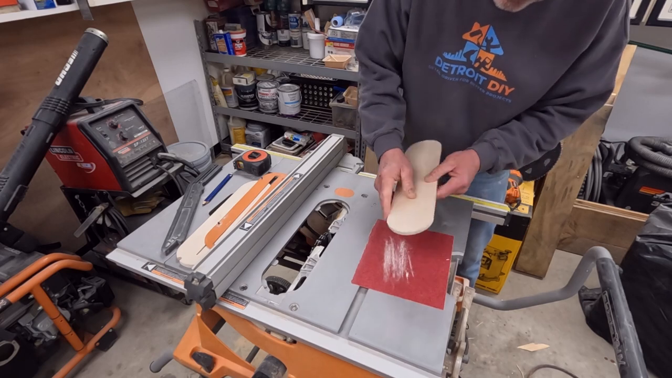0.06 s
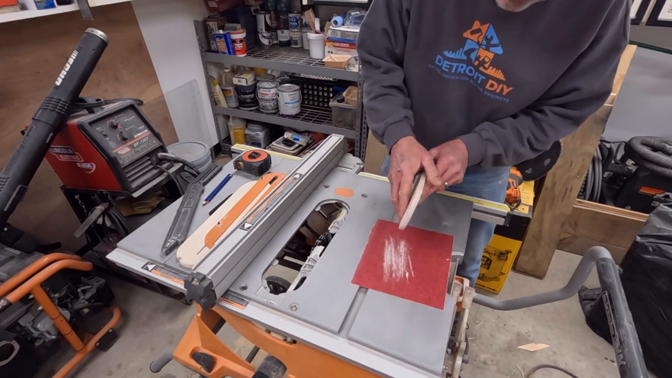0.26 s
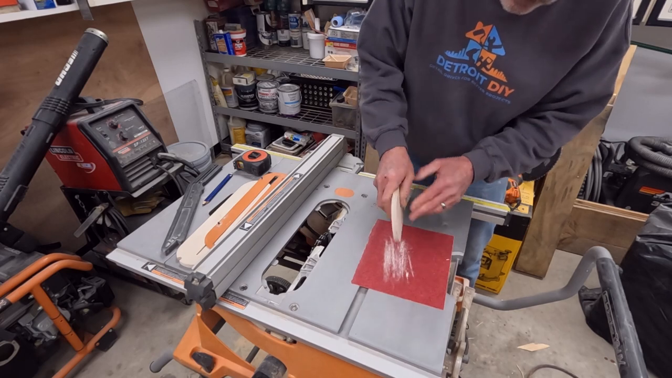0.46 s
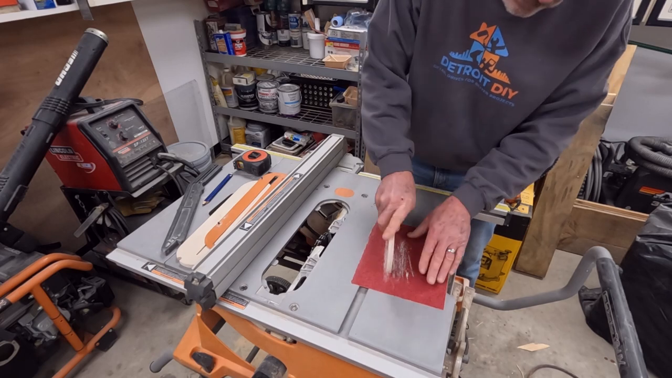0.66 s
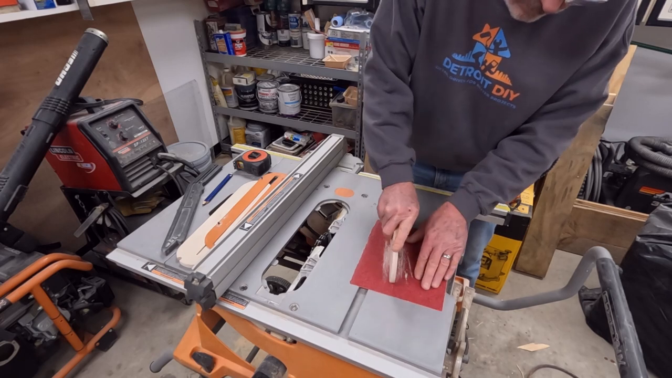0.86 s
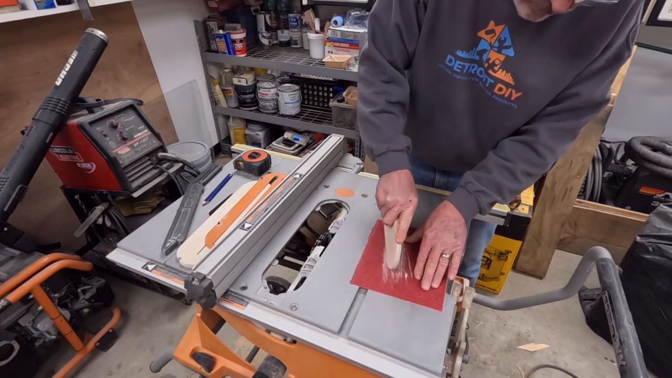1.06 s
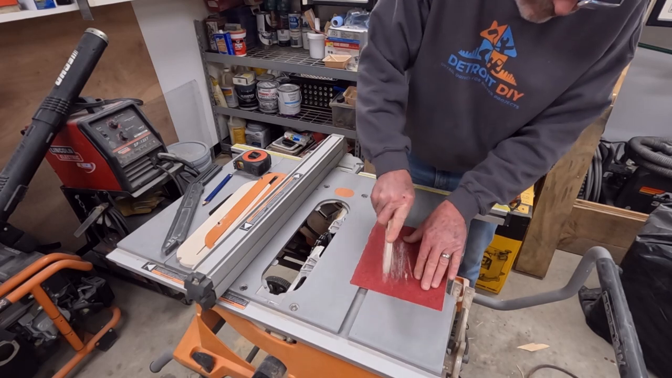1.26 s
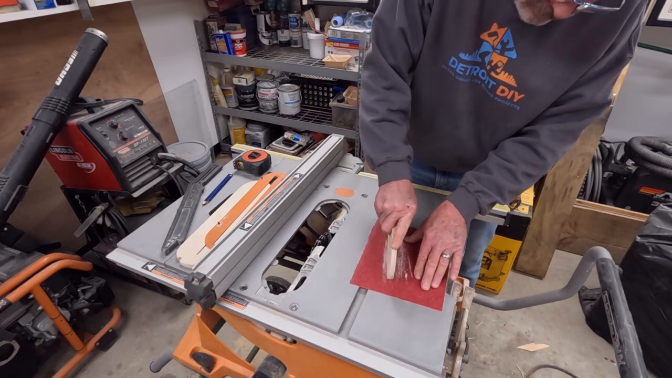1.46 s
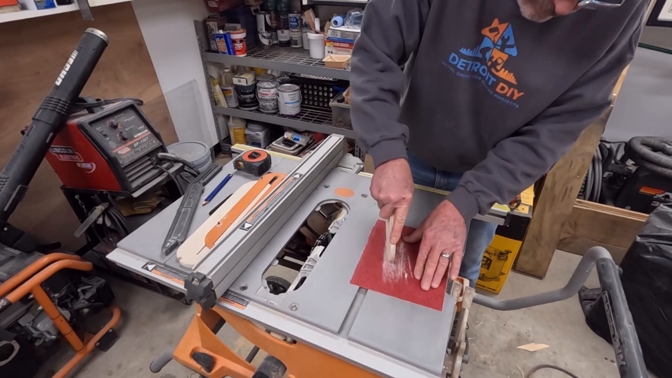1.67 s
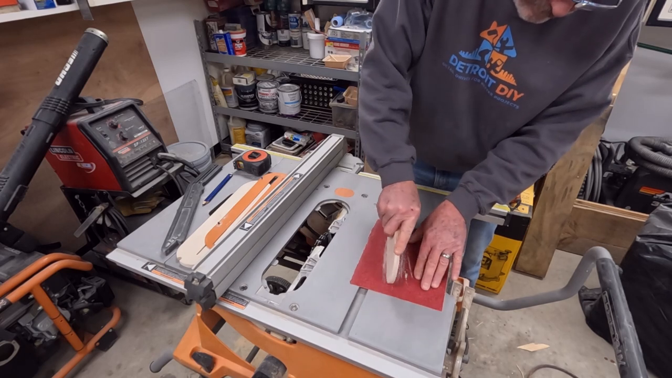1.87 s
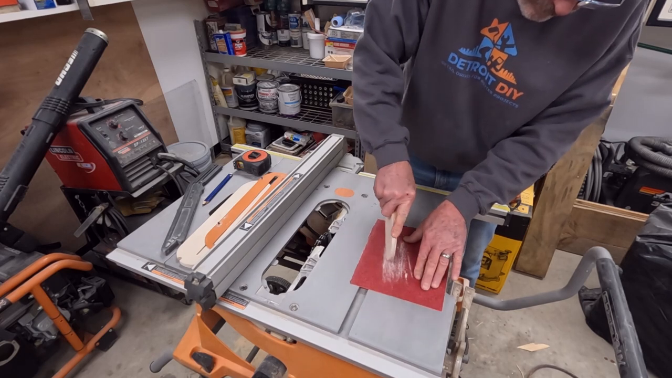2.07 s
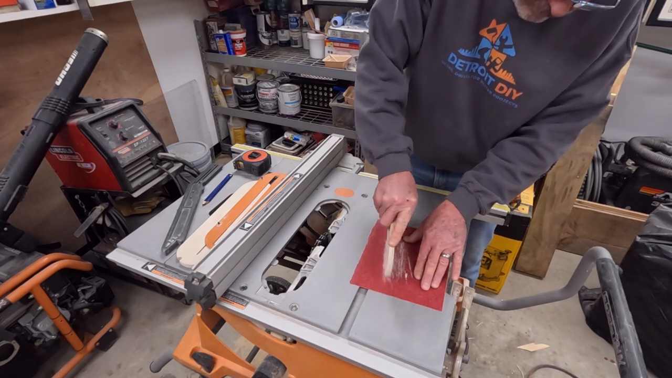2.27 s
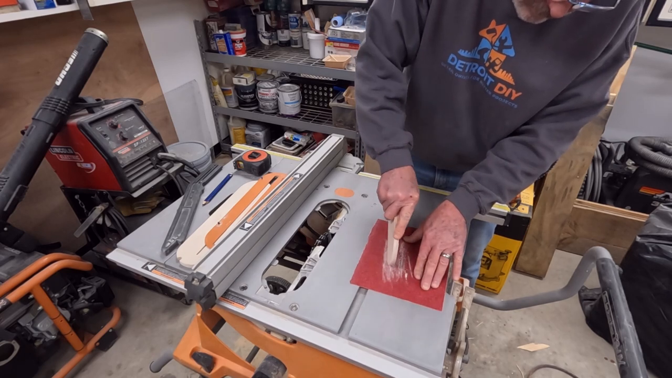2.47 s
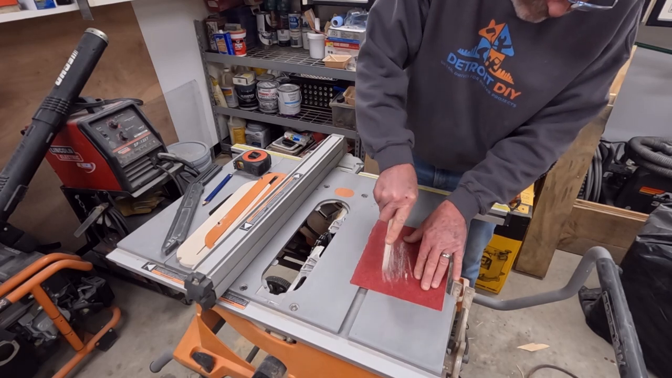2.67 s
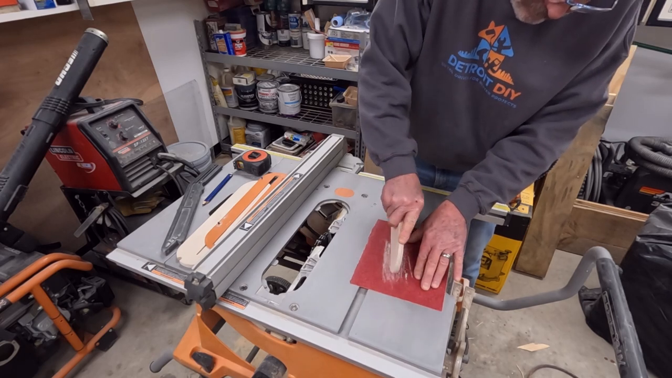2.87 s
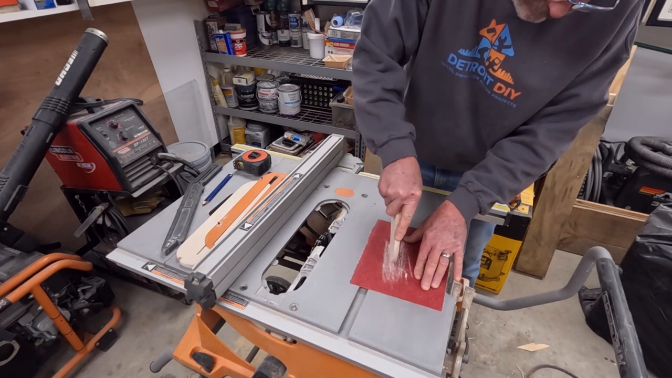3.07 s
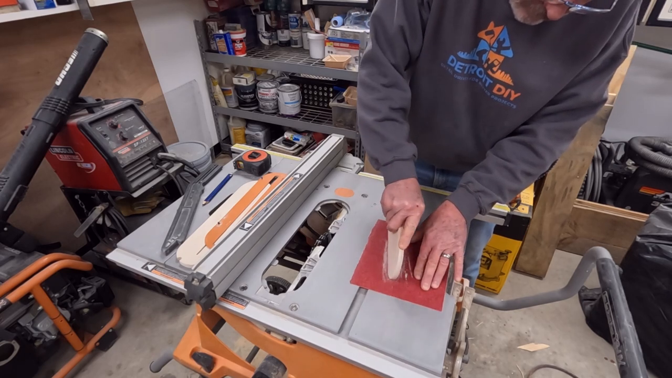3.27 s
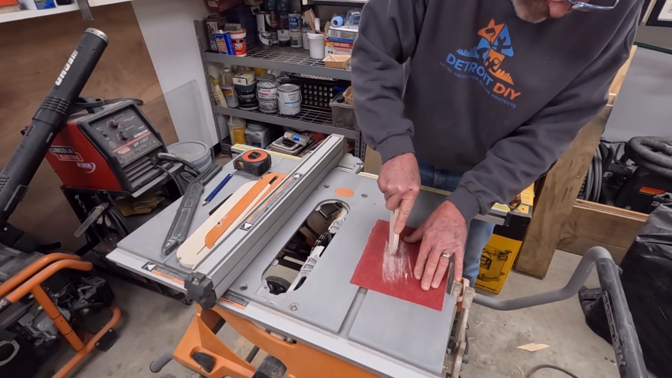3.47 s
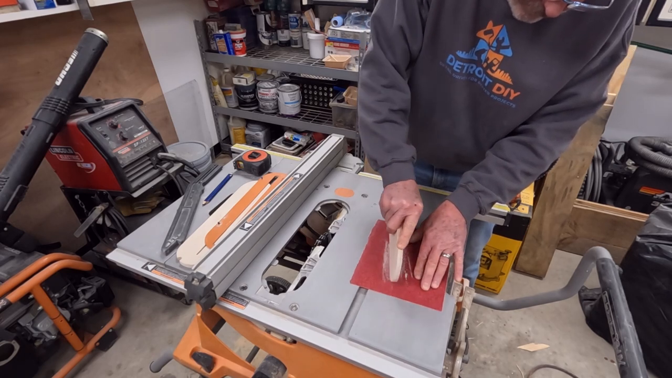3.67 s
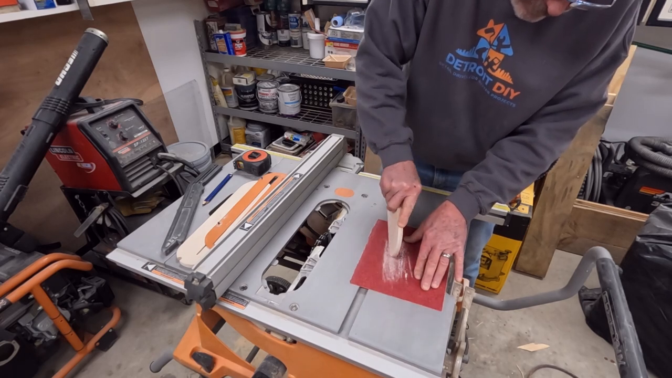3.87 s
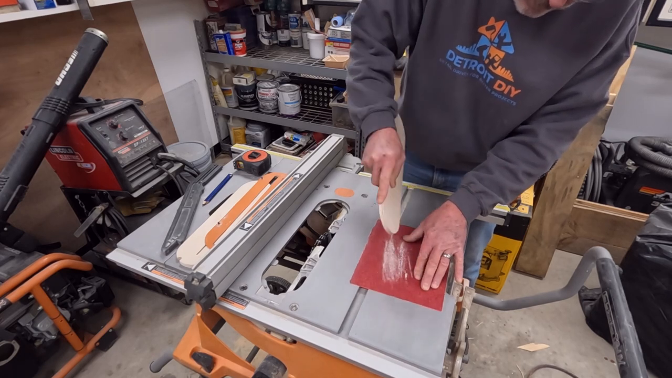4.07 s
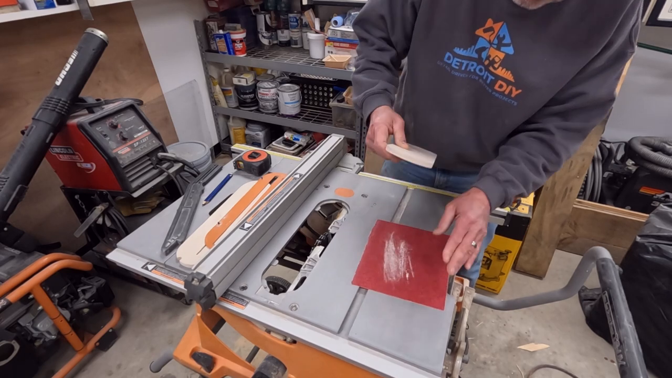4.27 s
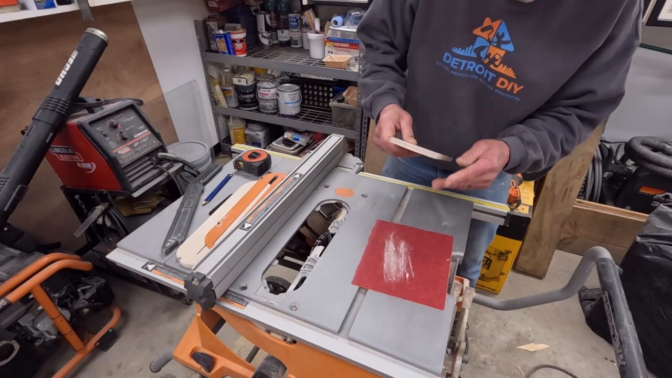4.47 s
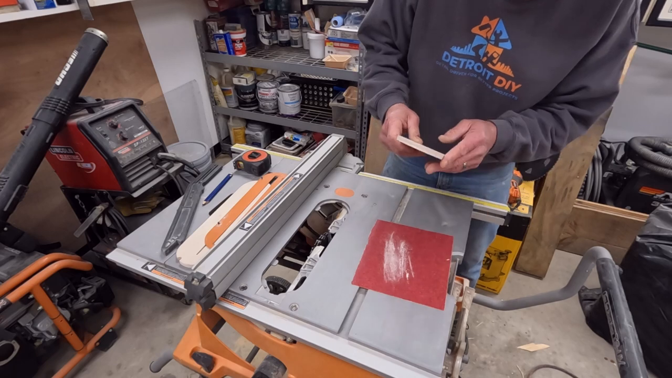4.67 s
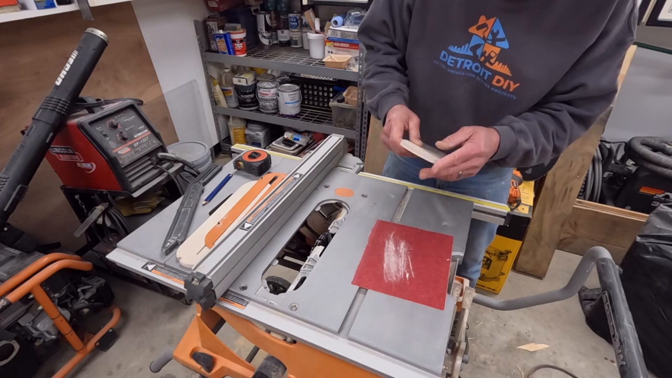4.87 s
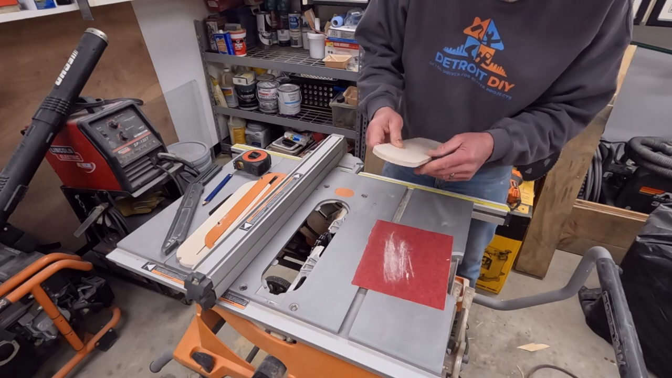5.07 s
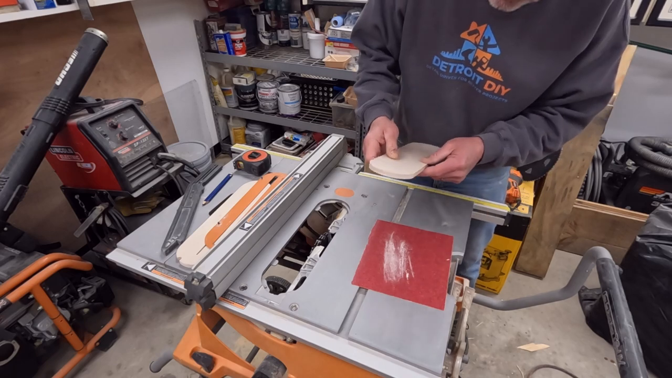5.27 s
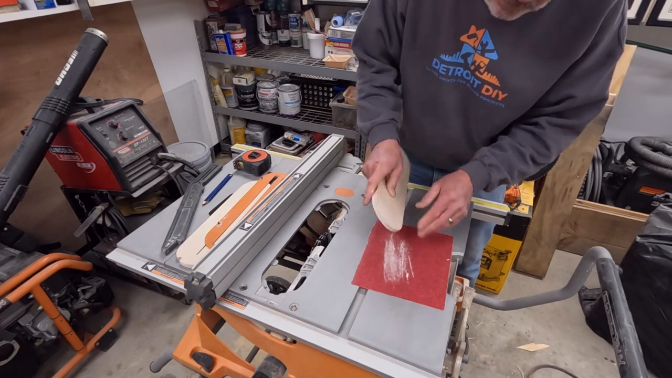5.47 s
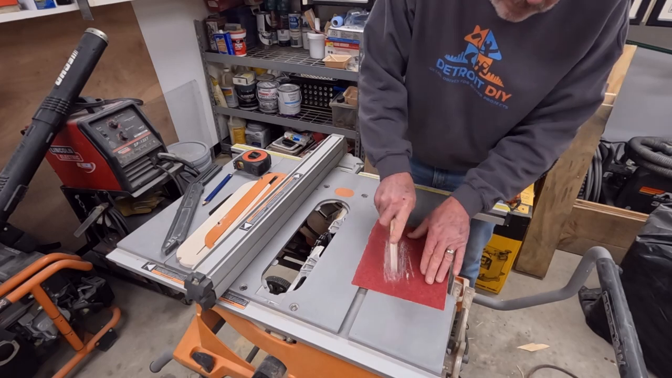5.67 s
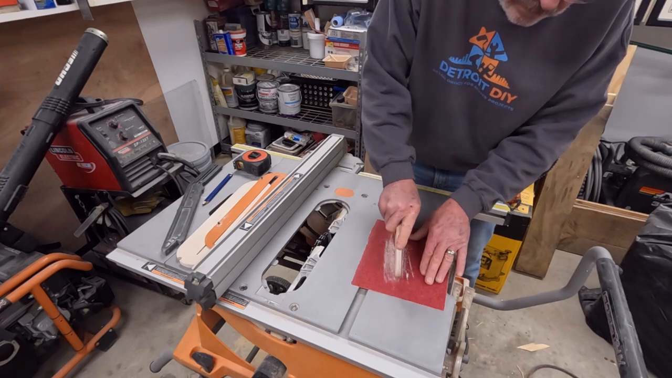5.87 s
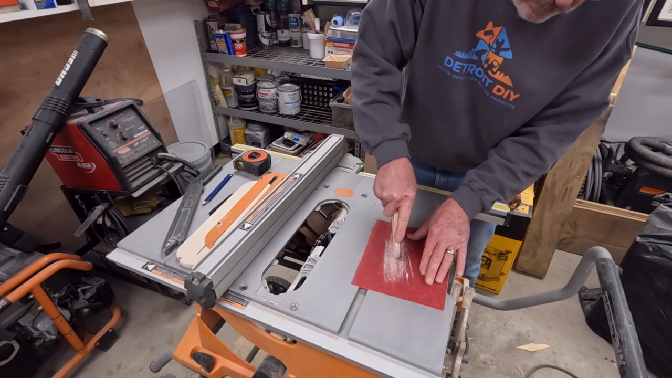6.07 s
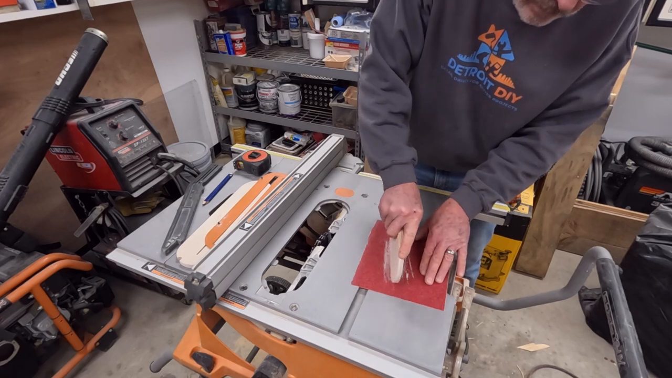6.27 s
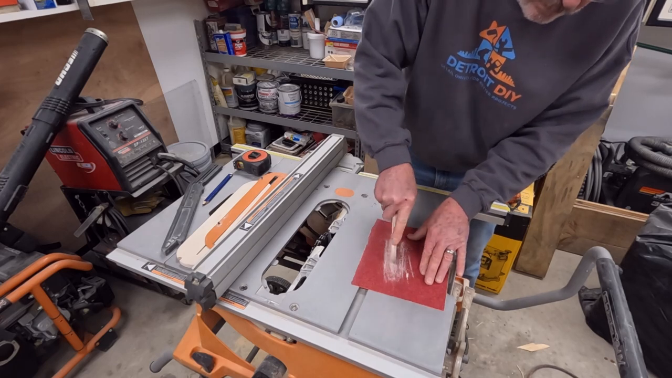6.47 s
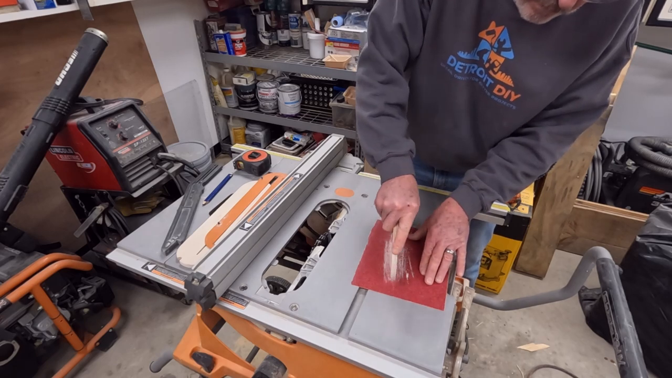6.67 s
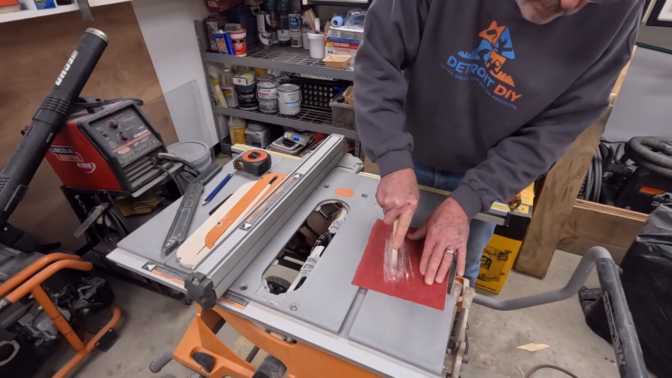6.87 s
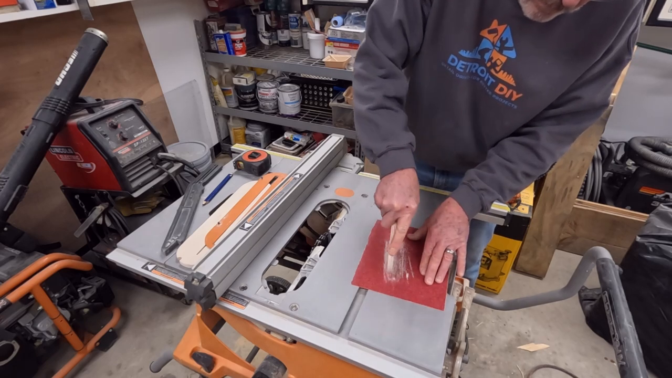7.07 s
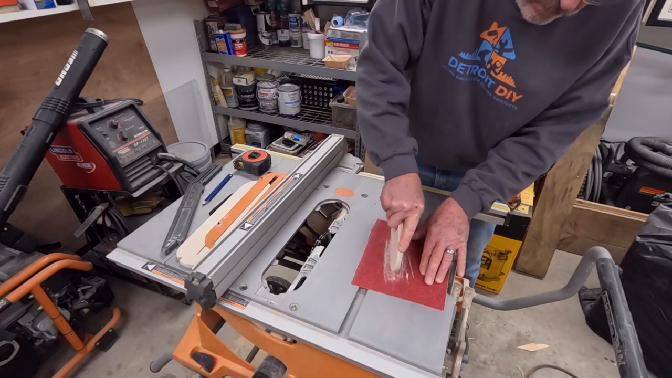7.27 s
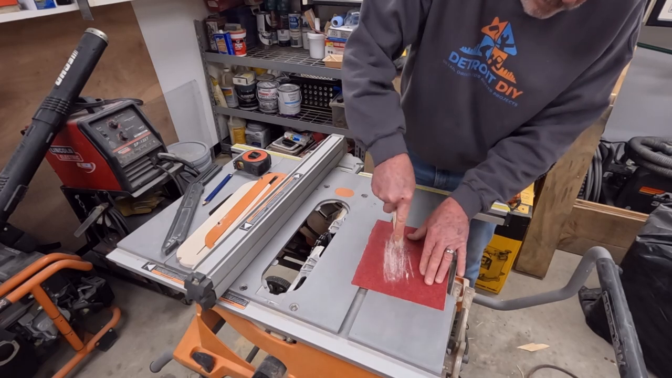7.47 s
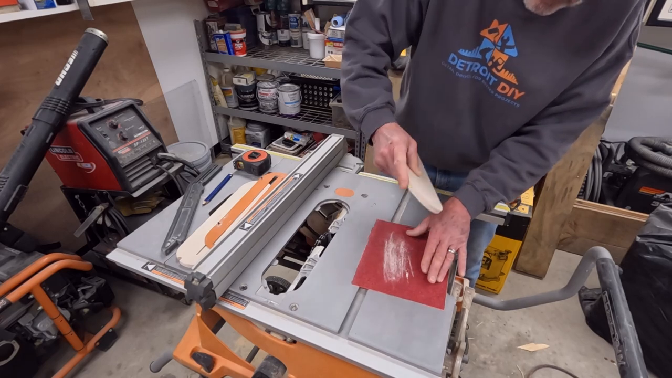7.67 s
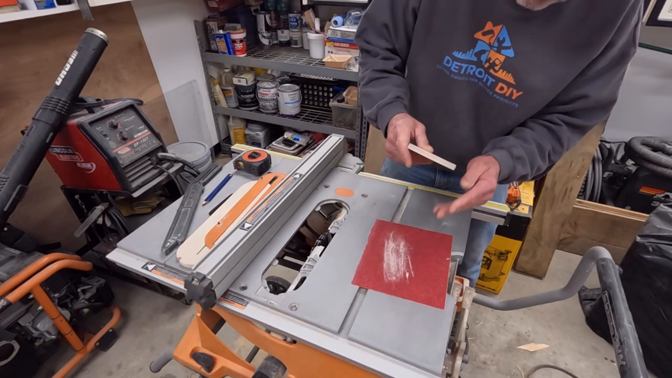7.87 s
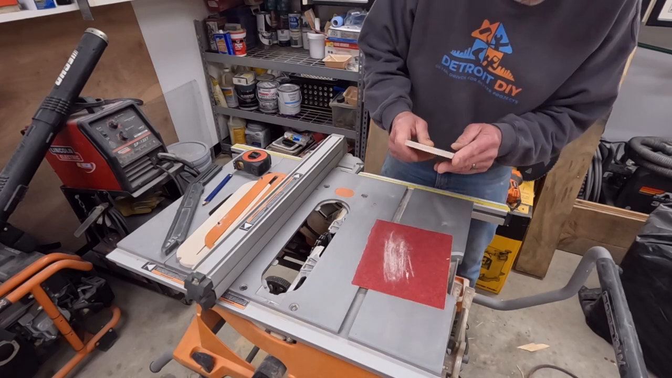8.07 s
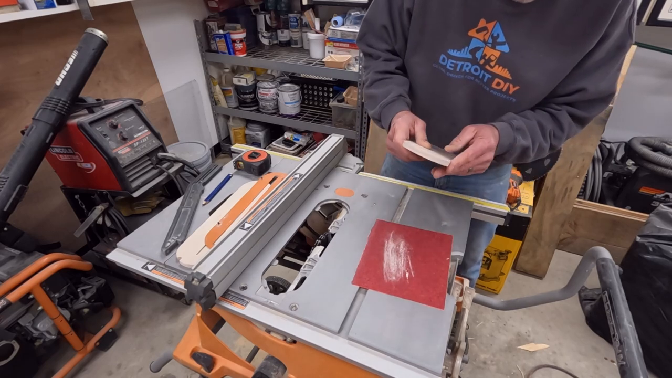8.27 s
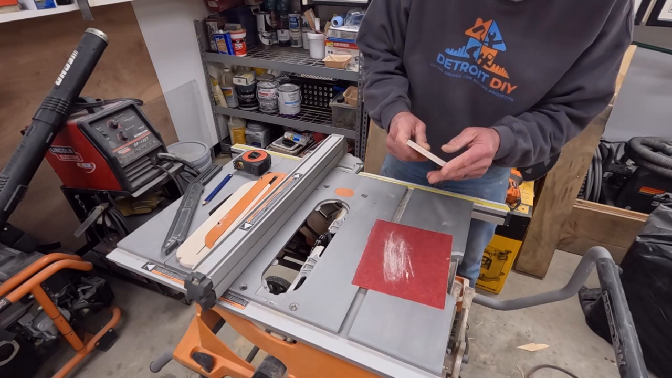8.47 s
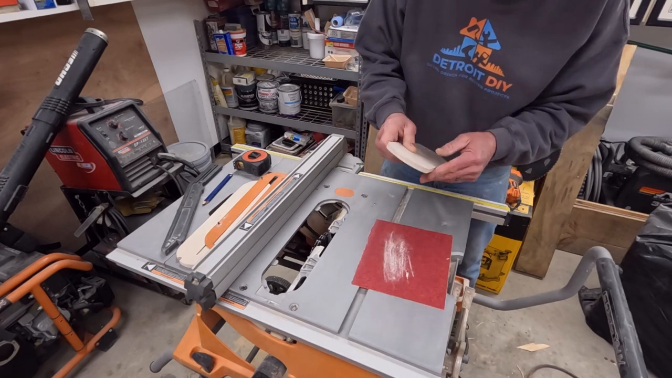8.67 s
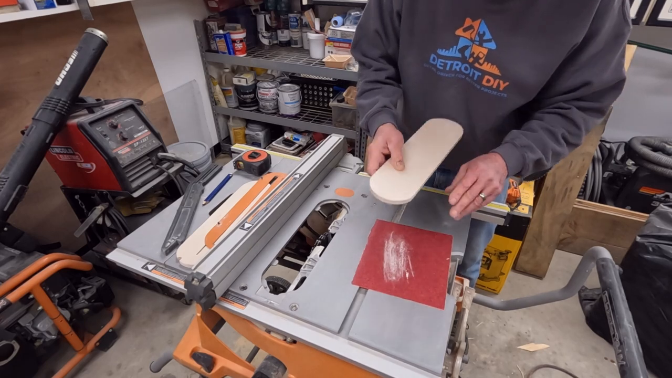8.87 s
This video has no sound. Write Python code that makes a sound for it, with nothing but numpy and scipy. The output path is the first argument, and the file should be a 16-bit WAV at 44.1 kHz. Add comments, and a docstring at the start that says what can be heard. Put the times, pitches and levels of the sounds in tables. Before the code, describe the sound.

A thin plywood edge knocks down and rasps across sandpaper in short, quick strokes, with a pause between bouts, in a garage.

```python
"""A garage: the edge of a thin plywood piece is sanded on a sheet of sandpaper lying on a table saw.
Each stroke sets the edge down with a knock that rings the saw table, then drags it through the grit,
which hisses and rings the plywood. Between bouts the fingers turn the piece and feel along the edge;
sleeves rustle. A close, nearly mono microphone overloads on the knocks."""
import sys
import numpy as np
from scipy import signal
from scipy.fft import rfft, irfft, next_fast_len
from scipy.io import wavfile
from scipy.ndimage import map_coordinates

SR = 44100
rng = np.random.default_rng(int(sys.argv[2]) if len(sys.argv) > 2 else 0)


def pcm_store(signal):
    """Save signal as 16-bit PCM."""
    levels = np.round(np.clip(np.atleast_2d(signal), -1, 1) * 32767)
    wavfile.write(sys.argv[1], SR, levels.astype(np.int16).T)


N = 392919

# edge set down: start_s, level_db, hardness_db (scales the contact cutoff), crunch_db (re level)
LANDINGS = [(0.817, -7.5, -17.5, -28), (1.422, -5.5, -14, -21.5), (1.895, -6, -14, -24.5),
            (2.376, -5.5, 11, -13), (2.827, -7, -4, -13), (3.229, -8, -24, -31),
            (3.714, -5.5, -10.5, -25.5), (5.805, -7, -14.5, -31.5), (6.3, -6.5, 3, -24.5),
            (6.764, -5.5, 11, -13), (7.188, -8, -9, -31)]
# grit noise: freq_hz, density_db
GRIT_SPECTRUM = [(1200,-12),(2000,-6),(2400,-0.5),(2900,-1),(3500,-3),(4100,-9.5),(5100,-3),(6000,-8),(6800,-12.5),(8100,-8.5),(10000,-11.5),(12000,-18),(16000,-24)]
# light scuffing on wood: freq_hz, density_db
SCUFF_SPECTRUM = [(290, -61), (500, -9.5), (718, -5), (1030, -7), (1130, 0.5), (1570, -10), (1720, -8),
                  (2360, -6), (2690, -8), (3020, -5.5), (4090, -7.5), (5160, -5.5), (6420, -11),
                  (8700, -7.5), (16000, -23.5)]


def sanding(wood_db=-9.0, grit_db=-4.0, judder_db=2.04, flutter_db=1.0, shift_db=1.5, bass_hz=300):
    """Grit tears at the fibres: the drag rings the plywood, the grains hiss."""
    # plywood pressed on the paper: freq_hz, level_db, t60_s
    plywood_modes = [(133, -24, 0.102), (241, -4, 0.106), (267, 0, 0.041), (325, 3, 0.016), (357, 1, 0.016),
                     (407, -9, 0.075), (500, -2, 0.078), (564, -1, 0.079), (629, -5, 0.032),
                     (741, -9, 0.033), (1008, -14, 0.014), (1143, -8, 0.083), (1301, -4, 0.044),
                     (1479, -9, 0.031), (1723, -14, 0.008), (1925, -12, 0.017), (2191, -16, 0.031)]
    # drag force: freq_hz, density_db
    drag_spectrum = [(60,2.5),(200,0),(290,0),(500,-1.5),(900,1),(1400,-1.5),(2200,-2.5),(4000,2),(16000,-7)]
    # high rings of the edge: freq_hz, gain, t60_s
    edge_modes = [(2965,1,0.021),(3310,0.82,0.031),(5040,0.32,0.013),(6050,0.93,0.024),(7770,0.18,0.008)]
    rasp, bass, hiss = stroke_gains()
    grip = from_db(judder_db * drift(65))  # catch and slip
    teeth = grains(24000, spread_db=2.0)
    pull = grip * colour(teeth, drag_spectrum)
    deep = signal.lfilter(*signal.butter(1, bass_hz, fs=SR), pull)
    drag = bass * deep + rasp * (pull - deep)
    grit = colour(teeth, GRIT_SPECTRUM)
    # the contact point travels along the edge
    grit = rms_one(grit + wandering_rings(grit, edge_modes, depth_db=5, rate_hz=12))
    grit = moving_echo(grit, delay_s=0.000902, travel=0.13, gain=0.4, rate_hz=4.95)  # off the table top
    coarse = butter(grit, 4500, "low")
    grit = coarse + from_db(shift_db * drift(15)) * (grit - coarse)  # fresh and clogged patches
    scratch = hiss * grip * from_db(flutter_db * drift(270)) * grit
    return from_db(wood_db) * body(drag, plywood_modes) + from_db(grit_db) * scratch


def stroke_gains(settle_s=0.067, stop_s=0.018, lift_s=0.21, bite_s=0.007, grit_lag=0.88):
    """Rasp, bass and hiss gains: the edge creeps, speeds up, brakes, then grazes as it lifts."""
    # one push per landing: full_speed_s, length_s, run_up_s, rasp_db, hiss_db, swell_db,
    # creep_db (re push), graze_db (re push), bass_db (re rasp)
    pushes = [(1.028, 0.15, 0.038, -10.5, -20.5, 3.5, -27, -16.5, 4.5),
              (1.545, 0.16, 0.037, -10.5, -23, -3.5, -16, -12.5, -19),
              (2.007, 0.15, 0.035, -10.5, -22.5, 2.5, -15, -14, -3),
              (2.511, 0.078, 0.045, -13, -27, 3, -4.5, -12, 3),
              (2.906, 0.14, 0.017, -13, -27.5, 3, -4, -11.5, -3.5),
              (3.324, 0.18, 0.015, -11.5, -23, -1, -19, -14, 2.5),
              (3.835, 0.15, 0.061, -11.5, -24, 3, -13, -15, -5),
              (5.941, 0.14, 0.04, -11, -22, -1.5, -22, -12.5, 2.5),
              (6.426, 0.13, 0.032, -9.5, -22.5, 0.5, -18, -14, -5),
              (6.888, 0.11, 0.04, -14.5, -29.5, -1.5, -10, -11.5, -4),
              (7.328, 0.12, 0.047, -9.5, -21.5, 1.5, -21, -12.5, -7)]
    # the grit's bite changes briefly: centre_s, wood_change_db
    bites = [(1.18, -4.5), (3.033, 2.5), (5.999, 7.5), (6.556, 5), (7.438, -1.5)]
    t = np.arange(N) / SR
    rasp = bass = hiss = 0
    for (knock_s, *_), push in zip(LANDINGS, pushes):
        start_s, length_s, run_up_s, rasp_db, hiss_db, swell_db, creep_db, graze_db, bass_db = push
        pressure = from_db(swell_db * (np.clip((t - start_s) / length_s, 0, 1) - 0.5))
        early = np.maximum(start_s - t, 0) / run_up_s
        past_s = np.maximum(t - start_s - length_s, 0)
        creep = from_db(creep_db) * np.clip((t - knock_s) / settle_s, 0, 1) * (t < start_s)
        graze = from_db(graze_db) * np.maximum(1 - past_s / lift_s, 0) ** 1.68 * (t >= start_s)
        brake = np.exp(-past_s / stop_s)
        wood = np.maximum(np.exp(-early ** 1.5) * brake, creep + graze)
        grit = np.maximum(np.exp(-(early / grit_lag) ** 1.5) * brake, creep + from_db(1) * graze)
        rasp += from_db(rasp_db) * pressure * wood
        bass += from_db(rasp_db + bass_db) * pressure * wood
        hiss += from_db(hiss_db) * pressure * grit
    bite = from_db(sum(db * np.exp(-((t - centre_s) / bite_s) ** 2) for centre_s, db in bites))
    return rasp * bite, bass * bite, hiss * np.sqrt(bite)


def knocks(thud_db=29.5, contact_hz=8000, crush_s=0.00109, crunch_db=6.5):
    """The edge crushes grit and rings the saw table; a soft landing is duller."""
    # saw table: freq_hz, level_db, t60_s
    table_modes = [(142, -18, 0.12), (233, -4, 0.09), (266, -5, 0.032), (345, 0, 0.081), (344, 0, 0.17),
                   (415, -16, 0.166), (481, -11, 0.05), (591, -8, 0.034), (658, -5, 0.154),
                   (701, -5, 0.096), (777, -13, 0.049), (826, -13, 0.065), (928, -13, 0.036),
                   (1048, -14, 0.033), (1181, -13, 0.049), (1248, -16, 0.012), (1365, -12, 0.017),
                   (1615, -18, 0.045), (1713, -18, 0.036), (1908, -20, 0.027), (2223, -26, 0.017),
                   (2538, -25, 0.026), (2773, -32, 0.01)]
    starts_s, levels_db, hardness_db, crunches_db = np.transpose(LANDINGS)
    force, click = np.zeros(N), signal.unit_impulse(SR // 20)
    for start_s, db, hard_db in zip(starts_s, levels_db, hardness_db):
        onset = int((start_s + crush_s) * SR)
        pulse = butter(click, contact_hz * from_db(hard_db), "low")
        force[onset:onset + len(pulse)] += from_db(db + thud_db) * pulse
    crush = bursts(starts_s + crush_s, levels_db + crunches_db + crunch_db, t60_s=0.05)
    crunch = crush * colour(grains(9000, spread_db=7.5), GRIT_SPECTRUM)
    return table_damping(starts_s) * body(force, table_modes) + crunch


def table_damping(knocks_s, delay_s=0.033, fade_s=0.0079, press_db=-2.5):
    """Gain of the table's ring: free at each knock, then damped as the hand bears down."""
    t = np.arange(N) / SR
    since_s = t - knocks_s[np.maximum(np.searchsorted(knocks_s, t) - 1, 0)]
    return from_db(press_db * np.clip((since_s - delay_s) / fade_s, 0, 1))


def finger_rubs(level_db=-1.0, catch_db=1.9, treble_hz=4500, attack_s=0.034, release_s=0.026):
    """Fingers brush the lifted piece; its rings come and go with the grip."""
    # finger slides: start_s, length_s, level_db, treble_db (re level)
    slides = [(0.0, 0.0069, -31.5, -1), (0.071, 0.13, -43, 1.5), (0.23, 0.13, -49.5, 1),
              (0.348, 0.17, -39.5, 0.5), (0.503, 0.043, -41.5, 5.5), (0.603, .02, -37, 3),
              (0.632, 0.021, -41, 0), (0.703, 0.096, -46, 0.5), (4.16, 0.027, -41.5, 3),
              (4.221, 0.028, -47, 3.5), (4.703, 0.19, -60.5, 7.5), (4.84, 0.046, -46.5, 1.5),
              (5.024, 0.079, -43, -1), (5.214, 0.088, -45.5, -7), (5.3, 0.077, -40, -3),
              (5.431, 0.033, -37.5, 0), (5.496, .08, -42.5, 2), (5.607, 0.033, -42, 4),
              (7.576, 0.023, -40.5, -6), (7.715, 0.013, -42, 0), (7.813, .06, -49, 1.5),
              (8.187, 0.063, -61, 8.5), (8.355, 0.14, -45, -2.5), (8.599, 0.14, -40.5, 0.5)]
    # lifted piece: freq_hz, gain, t60_s
    lifted_modes = [(3060,0.56,.01),(3510,0.54,0.0078),(5780,0.38,.006)]
    low_gain = gestures([row[:3] for row in slides], attack_s, release_s)
    treble_rows = [(start_s, length_s, db + treble_db) for start_s, length_s, db, treble_db in slides]
    treble_gain = gestures(treble_rows, attack_s, release_s)
    brush = colour(grains(7000, spread_db=1.5), SCUFF_SPECTRUM)
    rings = wandering_rings(brush, lifted_modes, depth_db=3, rate_hz=8)
    rub = moving_echo(brush + rings, delay_s=0.000564, travel=0.16, gain=0.5, rate_hz=2.9)  # off palms
    dull = butter(rub, treble_hz, "low")
    return from_db(level_db + catch_db * drift(32)) * (low_gain * dull + treble_gain * (rub - dull))


def ticks_and_taps(tick_db=-6.5, tap_hz=1000):
    """Small ticks and taps: fingers on the wood, the piece tapping, grit catching as the edge creeps."""
    # ticks and hollow taps: start_s, tick_db, tap_db
    contacts = [(0.073, -23.5, -44), (0.383, -29, -50), (0.758, -24.5, -52), (1.34, -56, -34.5),
                (1.386, -56, -40), (1.868, -53.5, -34), (1.957, -26, -45), (2.319, -50.5, -39.5),
                (2.732, -53, -35), (3.286, -31, -48), (3.638, -55, -34), (3.68, -53, -49),
                (5.385, -53, -42), (5.719, -29, -64), (6.264, -53, -34), (7.24, -31.5, -48),
                (7.263, -36, -48), (7.713, -26.5, -54), (8.109, -49, -52)]
    starts_s, ticks_db, taps_db = np.transpose(contacts)
    scuff = grains(6000, spread_db=-12.0)
    tick = bursts(starts_s, ticks_db + tick_db, t60_s=0.12) * colour(scuff, SCUFF_SPECTRUM)
    hollow = resonate(resonate(scuff, tap_hz, t60_s=0.0064), tap_hz, t60_s=0.0064)
    return tick + bursts(starts_s, taps_db, t60_s=0.13) * rms_one(hollow)


def squeaks(level_db=3.0, pitch_hz=1745, t60_s=0.013):
    """A fingertip squeaks on the wood: short swells of narrow-band noise."""
    # fingertip slips: start_s, length_s, level_db
    slips = [(0.355, 0.0098, -42), (0.384, 0.018, -37), (0.492, 0.01, -38)]
    tone = resonate(resonate(rng.standard_normal(N), pitch_hz, t60_s), pitch_hz, t60_s)
    return from_db(level_db) * gestures(slips, attack_s=0.0052, release_s=0.0084) * rms_one(tone)


def sleeves(level_db=-1.0):
    """Sleeves shift with a dull rustle."""
    # sleeve movements: start_s, length_s, level_db
    shifts = [(0.0, 0.03, -35.5), (0.09, 0.23, -47), (0.355, .065, -45.5), (0.585, .06, -50.5),
              (0.765, .035, -41), (4.14, .06, -45.5), (4.25, 0.19, -57.5), (5.02, 0.15, -53.5),
              (5.17, 0.16, -52), (5.72, 0.09, -49.5), (7.58, 0.038, -43), (7.735, 0.026, -41.5),
              (7.82, .13, -55), (8.115, 0.014, -48), (8.2, 0.31, -56.5), (8.5, 0.26, -51)]
    # cloth noise: freq_hz, density_db
    cloth_spectrum = [(71, -47), (120, -4), (161, -2.5), (192, -5), (232, 1.5), (316, 0), (362, -8),
                      (455, -11), (900, -9), (1170, -11), (1980, -120)]
    cloth = colour(rng.standard_normal(N), cloth_spectrum)
    return from_db(level_db) * gestures(shifts, attack_s=0.025, release_s=0.027) * cloth


def garage(x, wet_db=-12.0, build_s=0.012, scatter_hz=3200):
    """Add near reflections and a diffuse tail that builds up, then dies band by band."""
    # off table top, floor and ceiling: delay_s, gain
    reflections = [(0.00247, 0.19), (0.00686, -0.23), (0.01603, -0.11), (0.01935, -0.22), (0.02994, -0.08),
                   (0.03517, 0.04)]
    # diffuse tail: freq_hz, t60_s, level_db
    reverb_bands = [(90,0.12,-6),(200,0.54,10.5),(292,1,-12.5),(389,0.57,6),(550,0.36,-0.5),(1100,0.31,1),(2510,0.39,2.5),(5000,0.4,2.5),(12000,0.22,-0.5)]
    t = np.arange(int(SR * 0.7)) / SR
    freq_hz, t60_s, level_db = np.transpose(reverb_bands)
    edges_hz = np.geomspace(60, 17000, 14)
    tail, near = np.zeros((2, len(t)))
    for low_hz, high_hz in zip(edges_hz, edges_hz[1:]):
        centre_hz = np.sqrt(low_hz * high_hz)
        bandpass = signal.butter(2, [low_hz, high_hz], "band", fs=SR, output="sos")
        band = signal.sosfilt(bandpass, rng.standard_normal(len(t)))
        decay_db = 60 * t / at_hz(np.c_[freq_hz, t60_s], centre_hz)
        tail += band * from_db(at_hz(np.c_[freq_hz, level_db], centre_hz) - decay_db)
    tail *= np.minimum(t / build_s, 1)
    for delay_s, gain in reflections:
        near[int(delay_s * SR)] += gain
    near = butter(near, scatter_hz, "low")  # clutter scatters the treble
    response = near + from_db(wet_db) * tail / np.linalg.norm(tail)
    return x + signal.oaconvolve(x, response)[:N]


def room_tone(air_db=-49, whine_db=-69.0, whine_hz=8450, side_db=-71.0):
    """Low rumble and microphone hiss with a narrow high band; nearly mono."""
    # rumble and hiss: freq_hz, density_db
    air_spectrum = [(12, -30.5), (20, 9.5), (33, -15), (60, -8.5), (134, -14.5), (399, -17.5), (759, -22.5),
                    (1060, -21), (3070, -28.5), (6910, -33), (8410, -29.5), (11100, -36), (13200, -36),
                    (16000, -43)]
    air = from_db(air_db) * colour(rng.standard_normal(N), air_spectrum)
    whine = from_db(whine_db) * rms_one(resonate(rng.standard_normal(N), whine_hz, t60_s=0.007))
    side = from_db(side_db) * rms_one(butter(rng.standard_normal(N), 13000, "low"))
    return air + whine + side * np.array([[1], [-1]])


def from_db(db):
    """Decibels to gain."""
    return 10 ** (np.asarray(db) / 20)


def rms_one(x):
    """Scale to rms 1."""
    return x / np.sqrt(np.mean(x ** 2) + 1e-20)


def at_hz(points, hz):
    """Read a table on a log-frequency axis."""
    known_hz, values = np.transpose(points)
    return np.interp(np.log(hz + 1e-3), np.log(known_hz), values)


def drift(rate_hz):
    """Slow random wander, rms 1."""
    step, warm_up = 20, 2000
    pole = np.exp(-2 * np.pi * rate_hz * step / SR)
    noise = rng.standard_normal(N // step + warm_up + 2)
    slow = signal.lfilter([1], [1, -2 * pole, pole * pole], noise)[warm_up:]
    return np.interp(np.arange(N) / step, np.arange(len(slow)), rms_one(slow))


def butter(x, hz, kind):
    """Second-order low- or high-pass."""
    return signal.sosfilt(signal.butter(2, min(hz, SR / 2 - 1), kind, fs=SR, output="sos"), x + 1e-18)


def colour(x, spectrum):
    """Give steady noise a spectrum; rms 1."""
    size = next_fast_len(N)
    shape = from_db(at_hz(spectrum, np.arange(size // 2 + 1) * SR / size))
    return rms_one(irfft(rfft(x, size) * shape, size)[:N])


def resonate(x, hz, t60_s):
    """One resonance, peak gain 1."""
    radius = from_db(-60 / (t60_s * SR))
    feedback = [1, -2 * radius * np.cos(2 * np.pi * hz / SR), radius ** 2]
    return signal.lfilter(np.array([1, 0, -1]) * (1 - radius ** 2) / 2, feedback, x + 1e-18)


def body(force, modes):
    """Drive modes of alternating sign; unit power gain for white noise."""
    click = signal.unit_impulse(SR // 2)
    response = sum((-1) ** k * from_db(db) * resonate(click, hz, t60_s)
                   for k, (hz, db, t60_s) in enumerate(modes))
    return signal.oaconvolve(force, response / np.linalg.norm(response))[:N]


def wandering_rings(x, modes, depth_db, rate_hz):
    """Resonances that swell and fade independently."""
    return sum(gain * from_db(depth_db * drift(rate_hz)) * resonate(x, hz, t60_s)
               for hz, gain, t60_s in modes)


def moving_echo(x, delay_s, travel, gain, rate_hz):
    """Add a close reflection whose path wanders, sliding peaks and dips through the treble; rms 1."""
    lag = delay_s * SR * np.exp(travel * drift(rate_hz))
    return rms_one(x + gain * map_coordinates(x, [np.arange(N) - lag], order=3))


def grains(per_s, spread_db):
    """Tiny random collisions of uneven size; rms 1."""
    sizes = from_db(spread_db * np.minimum(rng.exponential(1, N), 4)) * rng.choice([-1, 1], N)
    return rms_one(sizes * (rng.random(N) < per_s / SR))


def bursts(starts_s, levels_db, t60_s):
    """Envelope that jumps at each start and decays."""
    jumps = np.zeros(N)
    jumps[(starts_s * SR).astype(int)] = from_db(levels_db)
    return signal.lfilter([1], [1, -from_db(-60 / (t60_s * SR))], jumps + 1e-18)


def gestures(rows, attack_s, release_s):
    """Envelope of movements: each rises until its start, holds, decays; the strongest leads."""
    t, envelope = np.arange(N) / SR, np.zeros(N)
    for start_s, length_s, db in rows:
        early = np.maximum(start_s - t, 0) / attack_s
        late = np.maximum(t - start_s - length_s, 0) / release_s
        envelope = np.maximum(envelope, from_db(db) * np.exp(-early - late))
    return envelope


def scene(treble_width=0.007, low_cut_hz=85):
    """Work at the table, nearly mono, with a faint stereo width in the treble."""
    work = knocks() + sanding() + finger_rubs() + sleeves() + squeaks() + ticks_and_taps()
    mid = butter(garage(work), low_cut_hz, "high")
    side = treble_width * np.gradient(mid)
    return mid + side * np.array([[1], [-1]]) + room_tone()


def record(dry, ceiling=0.88, cutoff_hz=16000):
    """Overload flattens the loudest peaks; a steep low-pass cuts the top."""
    flattened = dry / (1 + (dry / ceiling) ** 6) ** (1 / 6)
    return signal.sosfilt(signal.ellip(10, 0.1, 80, cutoff_hz, fs=SR, output="sos"), flattened)


dry = scene()
out = record(dry)
pcm_store(out)
```